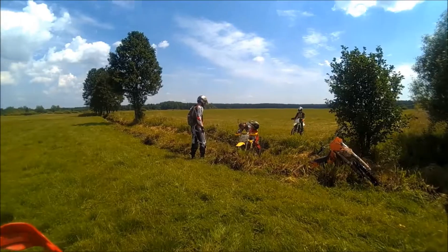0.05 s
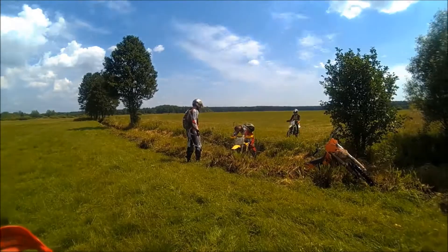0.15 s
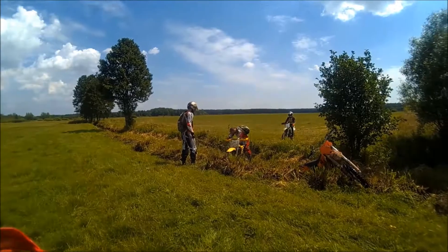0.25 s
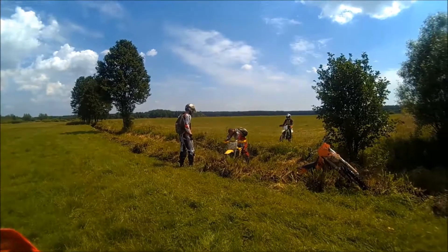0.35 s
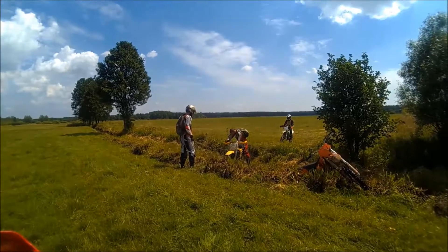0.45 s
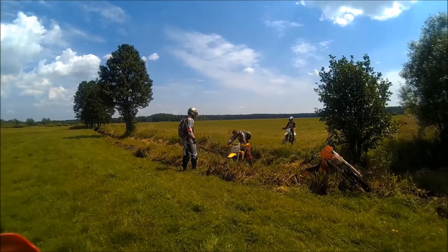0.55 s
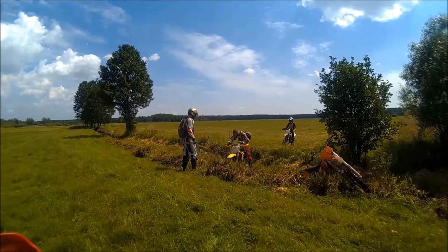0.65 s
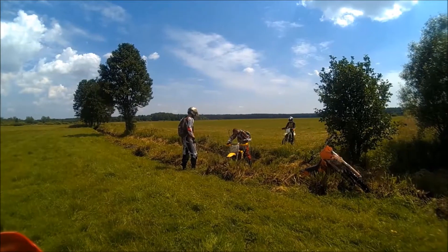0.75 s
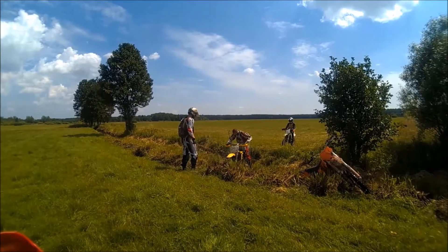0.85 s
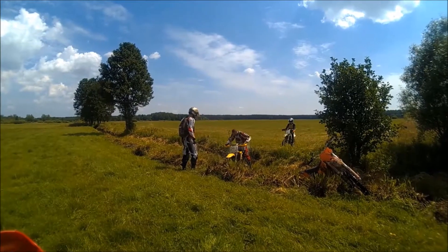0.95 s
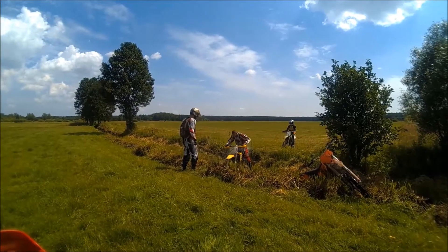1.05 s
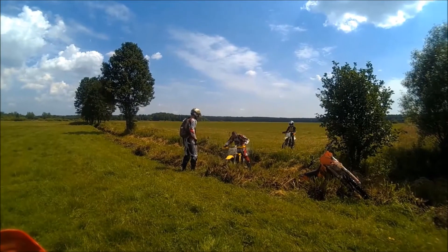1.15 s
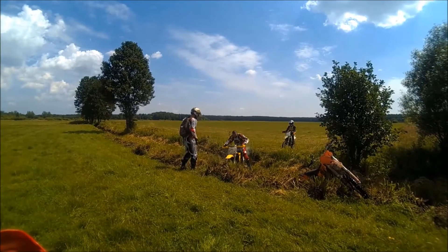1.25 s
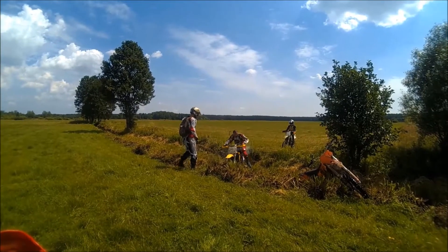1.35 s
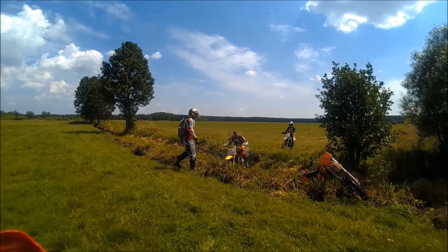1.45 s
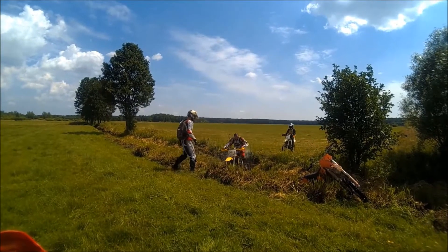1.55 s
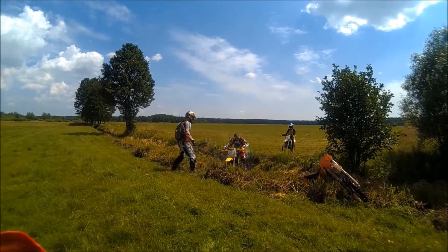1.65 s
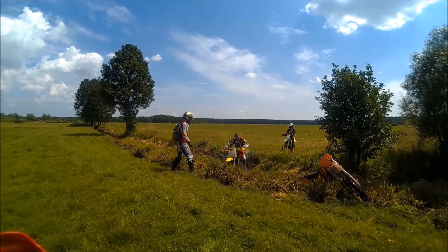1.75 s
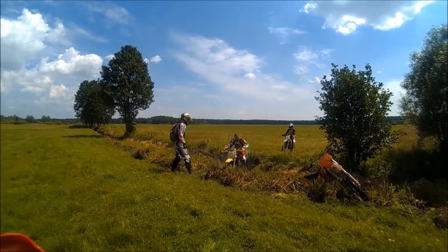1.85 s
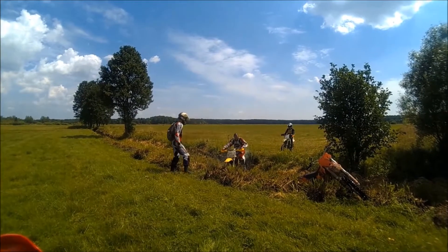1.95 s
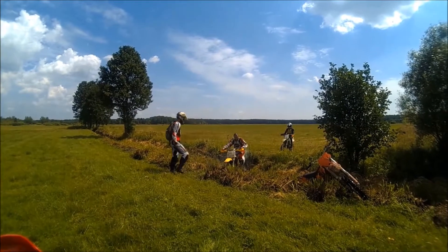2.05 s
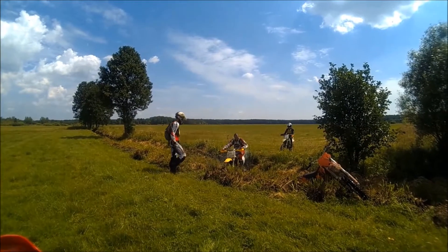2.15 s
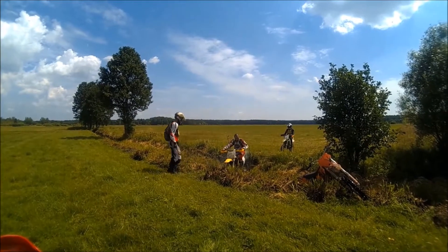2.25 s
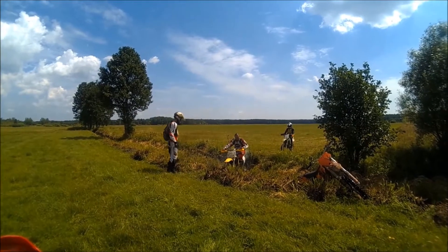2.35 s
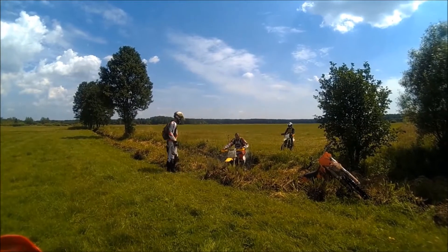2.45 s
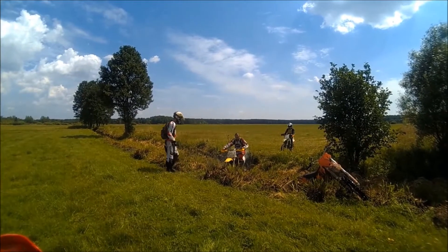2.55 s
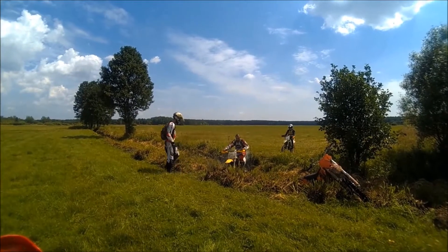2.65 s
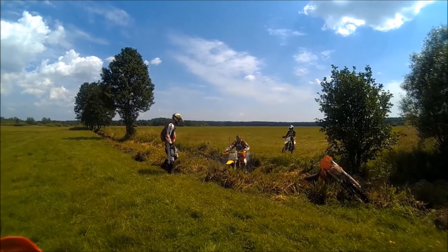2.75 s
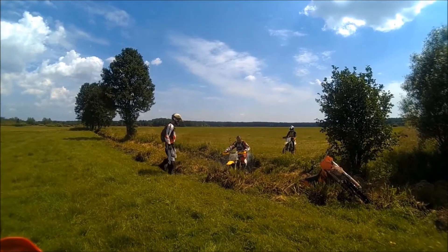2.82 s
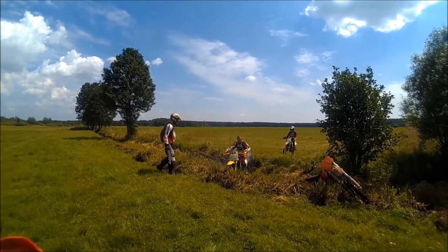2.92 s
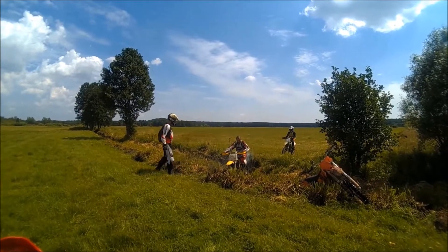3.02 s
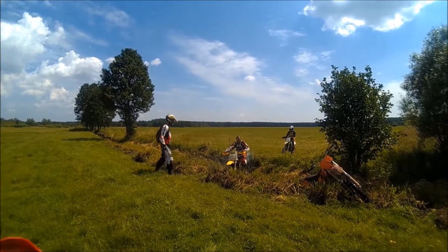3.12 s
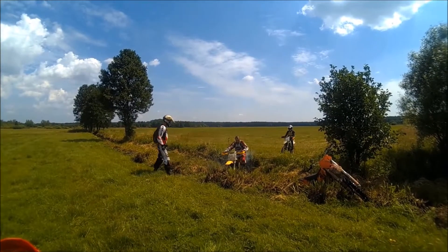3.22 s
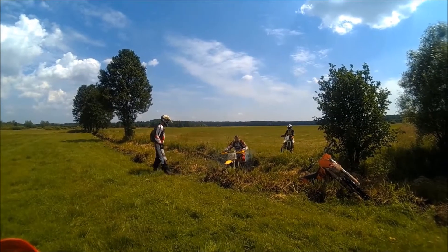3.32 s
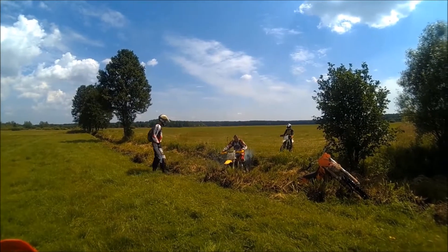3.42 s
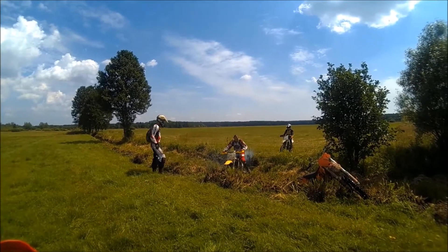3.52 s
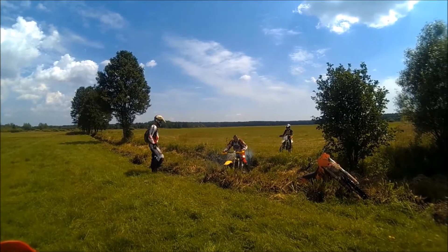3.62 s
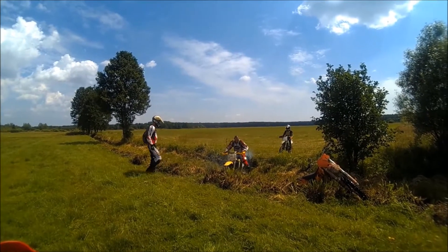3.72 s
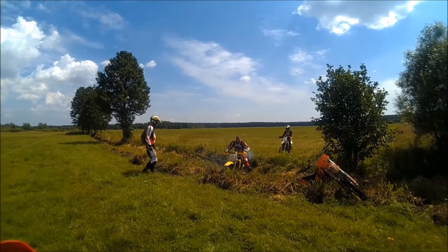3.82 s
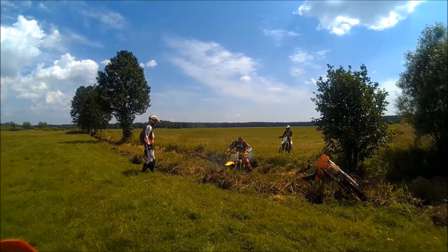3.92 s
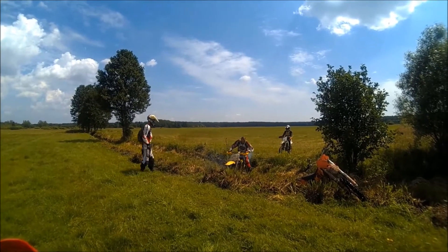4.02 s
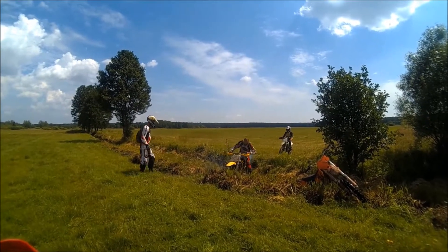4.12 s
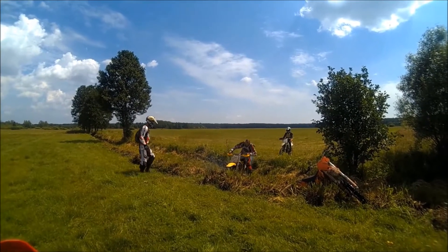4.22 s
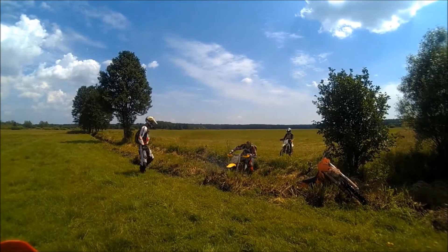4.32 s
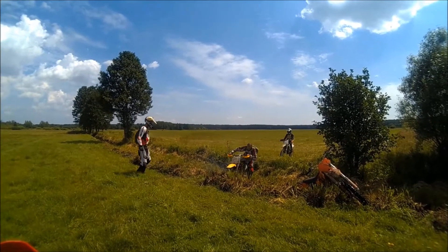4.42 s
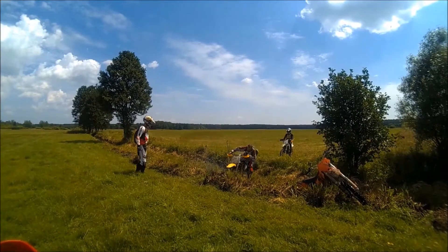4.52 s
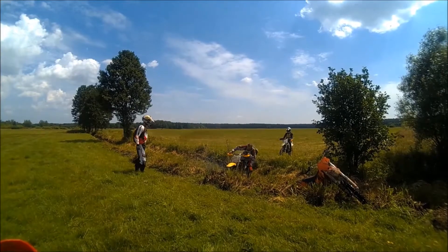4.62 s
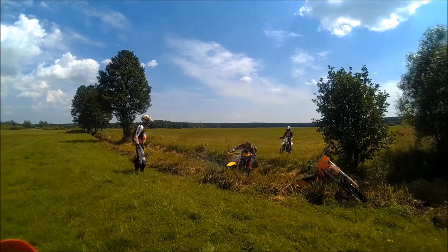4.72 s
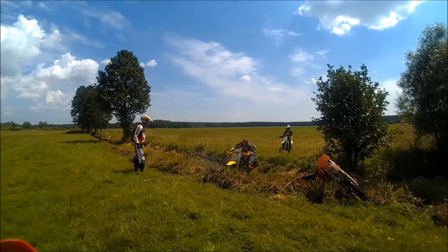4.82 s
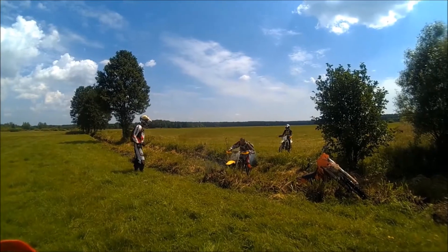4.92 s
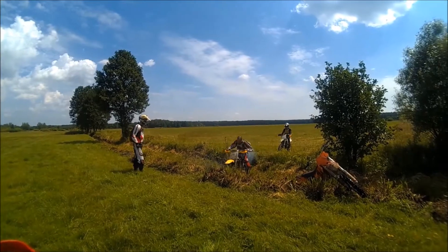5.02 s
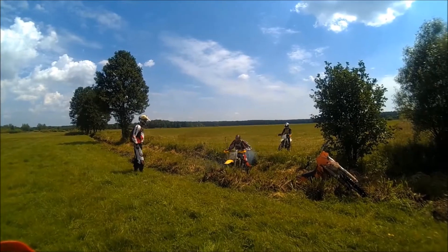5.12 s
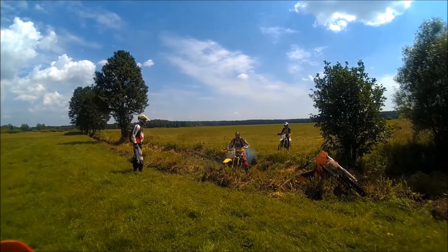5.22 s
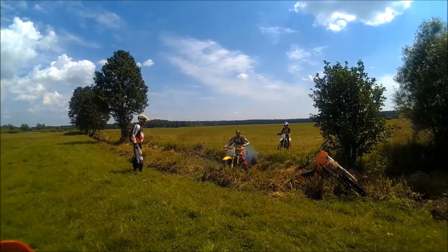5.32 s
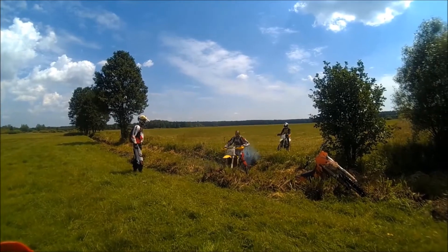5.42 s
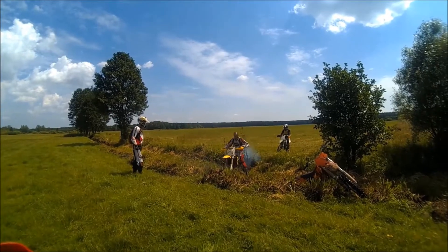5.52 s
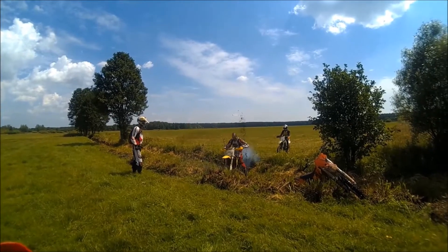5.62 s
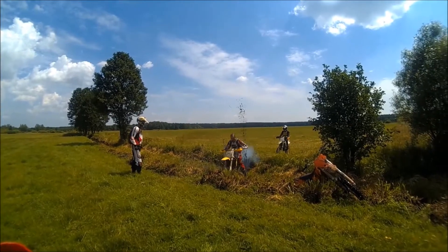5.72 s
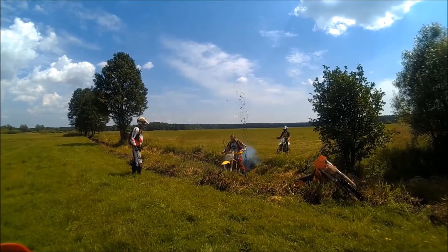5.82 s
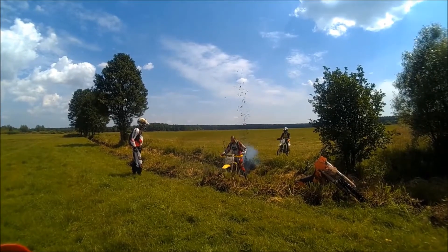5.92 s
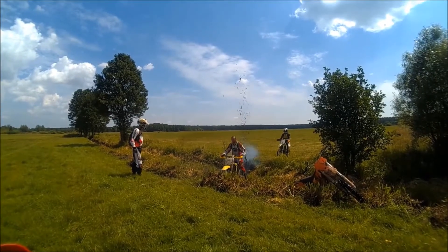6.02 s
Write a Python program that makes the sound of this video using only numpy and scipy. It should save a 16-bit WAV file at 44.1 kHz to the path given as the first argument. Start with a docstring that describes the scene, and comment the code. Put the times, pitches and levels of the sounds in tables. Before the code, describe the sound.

A two-stroke dirt bike is blipped again and again in a muddy ditch, popping and rasping, then held open in a loud boxy burst.

```python
"""An engine running down is heard first, with a brief gear whirr and a lone pop, dull and some way off.
It is a two-stroke dirt bike stuck in a muddy ditch, blipped again and again, then held open.
Crank orders and gated noise make its puffing and rasping, filtered impulses and noise bursts its hard pops.
A camera in a closed plastic housing hears it: the housing rings near 1.2 kHz and shuts out the treble.
Hiss, a low hum, a thin whine and faint high chirps lie beneath."""
import sys
import numpy as np
from scipy import signal
from scipy.fft import rfft, irfft
from scipy.io import wavfile
from scipy.ndimage import uniform_filter1d

SR = 44100
rng = np.random.default_rng(int(sys.argv[2]) if len(sys.argv) > 2 else 0)


def log_audio(samples):
    """Write samples as a 16-bit WAV file to the path given in sys.argv[1]."""
    # one column per channel
    frames = np.atleast_2d(samples).T
    # limit to full scale, then quantise
    limited = np.clip(frames, -1, 1)
    pcm = np.round(limited * 32767).astype(np.int16)
    wavfile.write(sys.argv[1], SR, pcm)


N = 267642
TIME = np.arange(N) / SR

# kicks of crank speed, mostly blips of the throttle (opening 0: a stray firing): start t/s, end t/s,
# crank speed reached f/Hz, drag while coasting after it [1/s], throttle opening [0-1], relative level/dB
KICKS = [(0.332, .45, 60.8, 0.89, 0.82, -.5), (.98, 1.1, 57.8, 0.83, 0.75, 0.5),
         (1.6, 1.64, 45.9, 1.06, 0, 2), (1.762, 1.84, 60.7, 0.89, 0.98, 0),
         (2.349, 2.44, 58.4, 0.81, 0.78, -1.5), (2.643, 2.73, 68.7, 0.93, 0.85, -1),
         (3.125, 3.31, 102.5, 0.87, 0.88, -1), (3.719, 3.77, 77.4, 1.33, .35, -1),
         (3.968, 4.09, 85, 1.14, 0.99, -2), (4.647, 4.75, 79.5, 1.05, 1, 0)]
# the long pull, in which the clutch bites once and the wheel then spins free: t/s, crank speed f/Hz
PULL = [(5.02, 61.6), (5.07, 93.3), (5.125, 107.2), (5.2, 72), (5.28, 87.0), (5.328, 100.7), (5.47, 109.8),
        (5.536, 111.3), (5.696, 109.7), (5.75, 103.1)]


def amp(db):
    """Amplitude ratio of a level: 20 dB per factor of ten."""
    return 10 ** (np.asarray(db) / 20)


def evened(x):
    """Normalisation by the root mean square: scales to rms 1."""
    return x / np.sqrt(np.mean(x ** 2) + 1e-20)


def curve(rows, axis=1):
    """Linear interpolation in time of one column of a table."""
    rows = np.asarray(rows)
    return np.interp(TIME, rows[:, 0], rows[:, axis])


def add(mix, s, sound):
    """Superposition: lays a sound into the mix at time s."""
    part = mix[max(round(s * SR), 0):][:len(sound)]
    part += sound[:len(part)]


def wander(rate_hz):
    """Gaussian low-pass filtering of white noise: a smooth random course of rms 1."""
    hz = np.fft.rfftfreq(N, 1 / SR)
    spectrum = rfft(rng.standard_normal(N)) * np.exp(-(hz / rate_hz) ** 2)
    return evened(irfft(spectrum, N))


def band(hz, width_hz):
    """Quadrature modulation: slow noise on two carriers gives narrow noise at a fixed or moving frequency."""
    angle = 2 * np.pi * np.cumsum(hz * np.ones(N)) / SR
    in_phase = wander(width_hz) * np.cos(angle)
    quadrature = wander(width_hz) * np.sin(angle)
    return evened(in_phase + quadrature)


def colour(x, points, modes=(), size=8192):
    """Minimum-phase filtering by a spectrum and its resonances: causal, so it rings after each pulse."""
    hz = abs(np.fft.fftfreq(size, 1 / SR))
    f, db = np.transpose(points)
    db = np.interp(np.log(hz + 1), np.log(f + 1), db)
    for centre, width, lift in modes:
        db = db + lift / (1 + (2 * (hz - centre) / width) ** 2)
    # the Hilbert transform of the log magnitude gives the phase
    log_response = np.conj(signal.hilbert(np.log(amp(db))))
    ring = np.fft.ifft(np.exp(log_response)).real
    return signal.oaconvolve(x, ring[:size // 2])[:N]


def hum():
    """Phase modulation: a low tone whose phase wavers and whose level wanders and swells."""
    # centres of the swells: t/s, lift level/dB
    hum_swells = [(.24, 9.5), (1.17, 7), (1.47, 1.5), (1.64, 8.5), (2.19, 7), (2.48, 3), (2.84, 6.5),
                  (3.9, 5), (4.779, 6), (5.05, 7.5)]
    hum_hz, hum_db, swell_s = 35, -71.5, .08
    swell_db = sum(lift * np.exp(-((TIME - s) / swell_s) ** 2) for s, lift in hum_swells)
    level = amp(hum_db + swell_db + 3.2 * wander(9))
    return level * evened(np.sin(2 * np.pi * hum_hz * TIME + .8 * wander(6.5)))


def chirps():
    """Gating: narrow noise is let through three times in every full second, and twice for longer."""
    # onsets within each second: t/s
    chirp_times = [.008, 0.29, .62]
    # two held chirps: onset t/s, length t/s
    held_chirps = [(3.623, .23), (3.997, .24)]
    chirp_s = .035
    spans = [(second + s, chirp_s) for second in range(N // SR) for s in chirp_times]
    gate = np.zeros(N)
    for s, length in spans + held_chirps:
        add(gate, s, signal.windows.tukey(round(length * SR), .3))
    return amp(-83.5) * np.minimum(gate, 1) * band(10400, width_hz=830)


def camera_noise():
    """Superposed self-noise: shaped hiss, hum, the phase-wavering whine of the electronics and chirps."""
    # shape of the steady background: f/Hz, relative level per Hz/dB
    floor_colour = [(20, -5.5), (60, -2.5), (150, -9), (400, -10.5), (1200, -5.5), (3500, -18.5),
                    (6000, -37.5), (8000, -37.5), (10500, -25), (14000, -24.5), (15700, -30)]
    hiss = amp(-71) * evened(colour(rng.standard_normal(N), floor_colour))
    whine = amp(-83) * np.sin(2 * np.pi * 14400 * TIME + 1.1 * wander(70))
    return hiss + hum() + whine + chirps()


def field(x, t60=0.32, size=16000):
    """Scattering and exponential decay: ditch banks and trees return a thin tail of sparse echoes."""
    t = np.arange(size) / SR
    echoes_per_s = 1500
    taps = rng.standard_normal(size) * (rng.random(size) < echoes_per_s / SR) * (t > .004)
    tail = taps * amp(-60 * t / t60)
    scattered = signal.oaconvolve(x, tail / np.linalg.norm(tail))[:N]
    return x + amp(-14) * scattered


def housed(x):
    """Transmission through a resonant enclosure: the camera's housing colours and muffles the sound."""
    # what the housing lets through: f/Hz, relative level/dB
    housing = [(40, -35.5), (110, -31), (350, -27.5), (600, -25), (950, -16), (1140, 3.5), (1320, 4),
               (1460, -14), (2100, -15.5), (3100, -18.5), (3750, -34), (4600, -37.5), (5900, -69),
               (12000, -70.5)]
    # its narrow resonances: f/Hz, width f/Hz, lift level/dB
    housing_modes = [(762, 60, 3.5), (1261, 25, 6), (1537, 110, 8.5), (1788, 22, 6), (2053, 90, 7.5),
                     (2310, 55, 5.5), (2730, 45, 6), (2909, 54, 5), (3045, 84, 7.5), (3578, 79, 7.5),
                     (4540, 40, 4.5), (6930, 500, 12)]
    return colour(x, housing, housing_modes) * amp(17)  # make-up gain


def pops(size=2600):
    """Impulse excitation: unburnt mixture goes off at once, a bark from the pipe with a bright crack."""
    # single hard firings, most of them while the throttle is open, a few stray: t/s,
    # relative bang level/dB, relative crack level/dB (added to that of the bang)
    firings = [(0.0293, -40, -26), (0.341, -33, -18), (0.386, -28.5, -22), (0.447, -29.5, -19.5),
               (0.996, -39.5, -9), (1.037, -28.5, -27), (1.0957, -29, -19.5), (1.617, -44.5, -6.5),
               (1.771, -32, -16), (1.8297, -28.5, -18), (2.37, -34, -13.5), (2.4123, -34, -14),
               (2.6504, -30.5, -18), (2.6859, -34.5, -12.5), (2.736, -29, -26), (2.965, -45, -2),
               (3.1647, -36.5, -13), (3.2413, -28, -16), (3.2929, -28, -14.5), (3.7583, -35, -8.5),
               (3.9854, -34, -8), (4.015, -29, -14.5), (4.0793, -29.5, -19), (4.6567, -35, -12.5),
               (4.718, -31.5, -15), (5.0904, -26.5, -16), (5.1285, -26.5, -14.5), (5.1451, -26, -14)]
    # colour of the bark: f/Hz, relative level/dB
    bang_colour = [(60, -4.5), (200, -3.5), (600, -6.5), (1000, -0.5), (1200, 1), (1400, -16.5),
                   (2000, -11.5), (8000, -3.5)]
    crack_colour = [(60, 0), (200, 1.5), (600, -2), (1200, -3.5), (2500, 4.5), (8000, 0.5)]  # f/Hz, level/dB
    t = np.arange(size) / SR
    shape = (1 - np.exp(-t / .002)) * np.exp(-t / .007)
    bang, crack = np.zeros(N), np.zeros(N)
    for s, db, crack_db in firings:
        add(bang, s, amp([db + 16]))
        burst = shape * rng.standard_normal(size)
        add(crack, s, amp(db + crack_db + 13.0) * burst)
    return colour(bang, bang_colour) + colour(crack, crack_colour)


def crank():
    """Rotation with drag: each kick lifts the turns per second, which then decay; the long pull comes last."""
    idle_hz, idle_drag_per_s = 35.05, .42  # the crank is running down before the first kick
    pull_drag_per_s = 1.7
    speed = idle_hz * np.exp(-idle_drag_per_s * TIME)
    for start, end, top_hz, drag, _, _ in KICKS:
        before = np.interp(start, TIME, speed)
        rise = np.sin(np.pi / 2 * np.clip((TIME - start) / (end - start), 0, 1))
        coast = np.exp(-drag * np.maximum(TIME - end, 0))
        speed = np.where(TIME < start, speed, (before + (top_hz - before) * rise) * coast)
    pull_coast = np.exp(-pull_drag_per_s * np.maximum(TIME - PULL[-1][0], 0))
    return np.where(TIME < PULL[0][0], speed, curve(PULL) * pull_coast)


def throttle(size=1500):
    """Smoothed gating of the load: 0 while the throttle is shut, up to 1 while it drives the crank."""
    intake_lead_s = 0.013  # in the blips the throttle opens this long before the crank answers
    pull_opening = 1.0
    spans = [(start, end, opening) for start, end, _, _, opening, _ in KICKS]
    # this shift cancels the lead: the pull opens together with its speed curve
    spans.append((PULL[0][0] + intake_lead_s, PULL[-1][0], pull_opening))
    gas = sum(opening * ((TIME > start - intake_lead_s) & (TIME < end)) for start, end, opening in spans)
    return uniform_filter1d(gas, size)


def loudness(speed, gas, size=1500):
    """Source strength grows with speed and load: relative levels of note and rasp in dB; the note flutters."""
    # a faster engine is mostly louder: crank speed f/Hz, relative note level/dB, relative rasp level/dB
    speed_levels = [(31.2, -53, -53.5), (45.3, -48, -51.5), (54.8, -43.5, -48.5), (66.7, -44.5, -49),
                    (83.5, -39, -42.5), (108.38, -38.5, -39.5)]
    # the long pull: t/s, relative note level/dB, relative rasp level/dB
    pull_levels = [(5.0, -46.5, -48.5), (5.09, -33, -37.5), (5.144, -36, -36.5), (5.174, -38.5, -43),
                   (5.258, -36.5, -39.5), (5.27, -35.5, -35.5), (5.406, -29, -35.5), (5.71, -32, -35.5),
                   (5.862, -43, -44.5), (5.934, -42, -46), (5.964, -47.5, -48), (6.06, -43.5, -49.5)]
    pull_db = 0.5
    # under throttle a slow engine misses between its pops and thins out;
    # from load_from_hz up it fires fully and gains
    load_from_hz, load_hz = 74, 110
    load_note_db, load_rasp_db = 6, 6.5  # added by full throttle at load_hz
    build_s = .022  # before the pull the note builds up this long behind the speed
    flutter_hz, flutter_db = 9, .9  # uneven burning
    level_db = np.zeros(N)
    for start, *_, db in KICKS:
        level_db[TIME > start] = db
    level_db = uniform_filter1d(level_db, size)
    speeds, note_db, rasp_db = np.transpose(speed_levels)
    built = np.interp(TIME - build_s, TIME, speed)
    note_load = gas * (built - load_from_hz) / (load_hz - load_from_hz)
    rasp_load = gas * (speed - load_from_hz) / (load_hz - load_from_hz)
    note = np.interp(built, speeds, note_db) + load_note_db * np.maximum(note_load, -.3) + level_db
    rasp = np.interp(speed, speeds, rasp_db) + load_rasp_db * np.maximum(rasp_load, 0) + level_db
    pulling = TIME > pull_levels[0][0]
    note = np.where(pulling, curve(pull_levels) + pull_db, note)
    rasp = np.where(pulling, curve(pull_levels, axis=2) + pull_db, rasp)
    return note + flutter_db * wander(flutter_hz), rasp


def exhaust_tone(turns, speed, count=36, size=170):
    """Fourier synthesis of crank orders; pipe and ground smear each pulse, so orders swell and drift apart."""
    # orders of the crank that stand out or sink: multiple of the crank speed, relative level/dB
    orders_db = [(1, 0), (2, .5), (4, -1), (5, 1), (6, -2), (7, 1), (8, -3), (9, 1), (11, 1), (12, 0),
                 (13, -2.5), (14, 4), (15, -3), (19, -2), (21, 1.5), (24, -2), (32, -3), (39, -1), (42, 1),
                 (48, -6)]
    slow, quick = np.linspace(0, N / SR, count), np.linspace(0, N / SR, size)
    tone = np.zeros(N)
    for k in range(1, round(orders_db[-1][0]) + 1):
        restless = min(k / 5, 1)  # the lowest orders are steadier
        swell_db = 3.2 * restless * rng.standard_normal(count)
        drift = np.cumsum(.4 * restless * rng.standard_normal(size)) + 2 * np.pi * rng.random()
        order_db = np.interp(k, *np.transpose(orders_db))
        height = np.interp(TIME, slow, amp(order_db + swell_db))
        tone += height * np.cos(2 * np.pi * k * turns + np.interp(TIME, quick, drift))
    return 2 * tone * np.sqrt(speed / SR)  # about as strong per Hz as white noise of rms 1


def gusts(turns, decay_turns, steady):
    """Turbulence modulated by the port: a rush of gas noise each time the exhaust port opens."""
    rush = steady + np.exp(-(turns % 1) / decay_turns)
    return evened(rush * rng.standard_normal(N))


def gear_whirr(speed):
    """Tooth-mesh frequency, teeth times speed: narrow noise of the primary gears, strongest near one speed."""
    gear_teeth = 41
    sing_hz, sing_slope_db, whirr_db = 47.3, -0.633, -64  # slope in dB per Hz away from sing_hz
    idle_whirr_db, idle_whirr_s = -71.5, 0.086  # a brief whirr as the crank runs down before the first kick
    sing = amp(sing_slope_db * abs(speed - sing_hz) + whirr_db)
    idle = amp(idle_whirr_db) * np.exp(-(TIME / idle_whirr_s) ** 2)
    return band(gear_teeth * speed, width_hz=150) * (sing + idle)


def engine():
    """Source and filter: crank orders and gas noise, coloured as note, rasp and boom, with the gear whirr."""
    # colours at the bike, each: f/Hz, relative level/dB; the rush of gas has its own, apart from the note's
    note_colour = [(60, -22), (250, -13), (500, -1), (850, 0), (1300, 0), (1600, -5), (2200, -16),
                   (8000, -30)]
    rush_colour = [(60, -23), (300, -12.5), (550, -4.5), (900, 2), (1300, 4.5), (1600, -7), (2200, -14.5),
                   (8000, -29)]
    rasp_colour = [(60, -18), (900, -18), (1300, -12), (1600, -2), (2200, 0), (8000, 1)]
    boom_colour = [(40, -22), (105, 8), (220, 3.5), (330, -2), (520, 4), (800, -19.5), (1200, -37),
                   (4000, -60.5)]
    # resonances of the pipe: f/Hz, width f/Hz, lift level/dB
    pipe_modes = [(466, 89, 6.5)]
    speed, gas = crank(), throttle()
    turns = np.cumsum(speed) / SR
    loud_db, rasp_db = loudness(speed, gas)
    tone = exhaust_tone(turns, speed, count=56)
    # burning strokes beat harder than coasting ones
    beat = 1 + (.15 + .45 * gas) * np.cos(2 * np.pi * (turns - .2))
    rush = gusts(turns, decay_turns=.3, steady=.9)
    # the note is cleanest when the crank coasts fast; near idle or under load it turns rough
    rough = np.interp(speed, [30, 45, 90], [.85, .46, .42]) + .15 * gas
    rough = np.clip(rough, 0, .9)
    clean = colour(np.sqrt(1 - rough ** 2) * tone * beat, note_colour, pipe_modes)
    note = (clean + colour(rough * rush, rush_colour)) * amp(loud_db - 2.3)
    rasp = colour(.6 * tone * beat + .85 * rush, rasp_colour) * amp(rasp_db + 6)
    # burning strokes have more weight in the bass
    bass = colour(tone + .12 * rush, boom_colour)
    boom = bass * amp(0.43 * loud_db + 12.9 * gas - 33.5)
    return note + rasp + boom + gear_whirr(speed)


def scene():
    """Transmission chain: the bike sounds through ditch and housing; the camera's noise is added after."""
    bike = engine() + pops()
    return (housed(field(bike)) + camera_noise())[None]


def record(dry):
    """Linear-phase low-pass filtering: the recorder's band limit."""
    edge_hz = 15740
    lowpass = signal.firwin(511, edge_hz, window=("kaiser", 9), fs=SR)
    return signal.oaconvolve(dry, lowpass[None], "same")


dry = scene()
out = record(dry)
log_audio(out)
```